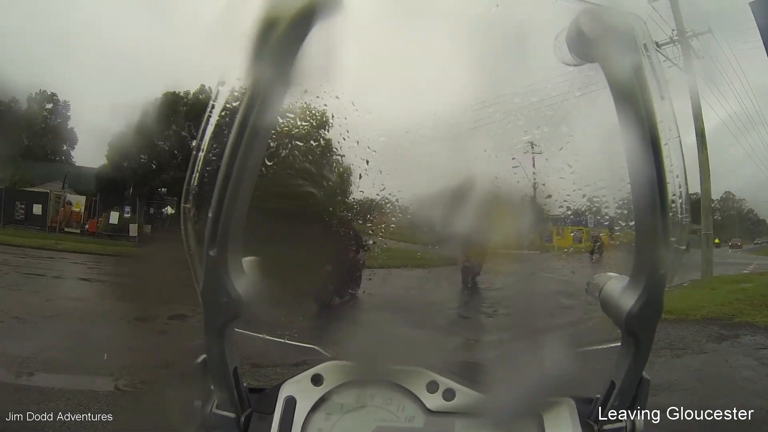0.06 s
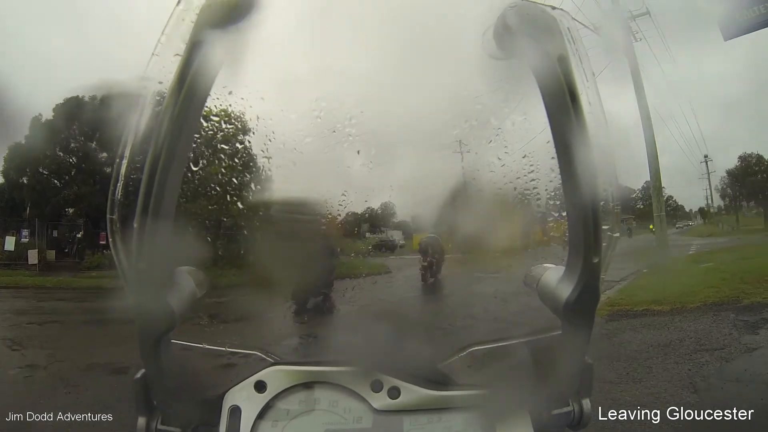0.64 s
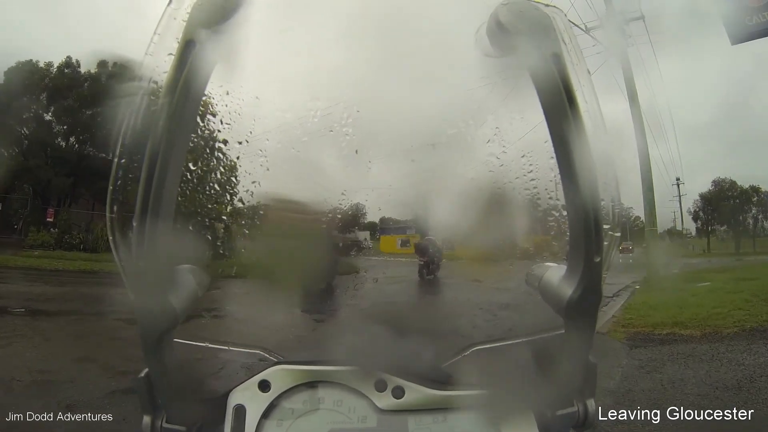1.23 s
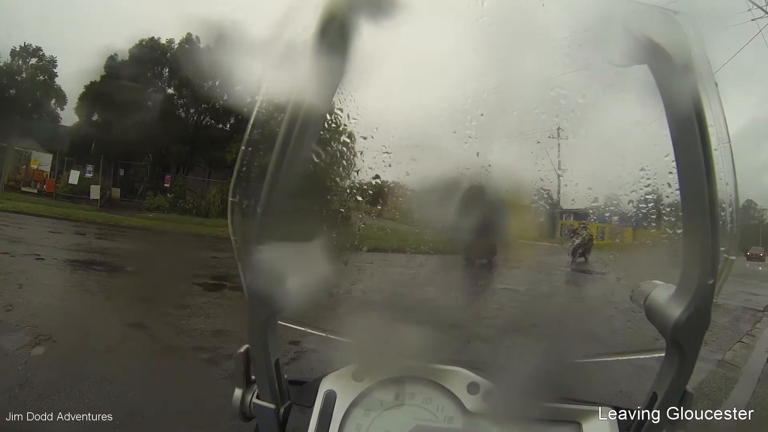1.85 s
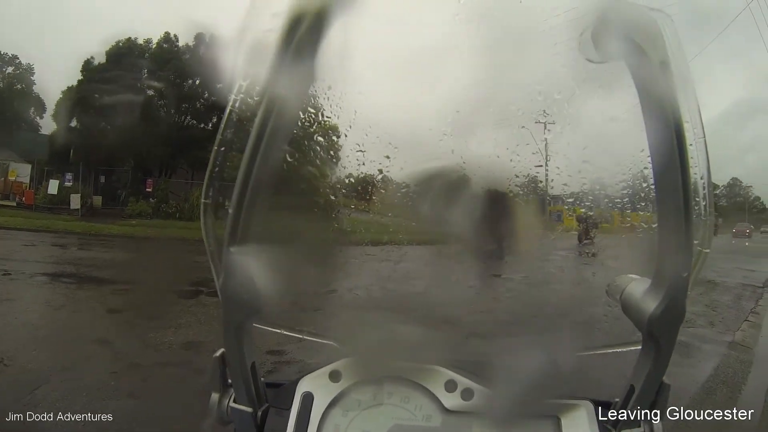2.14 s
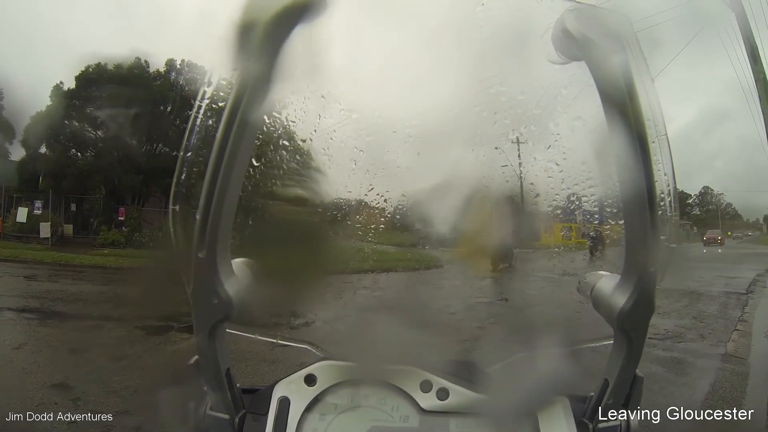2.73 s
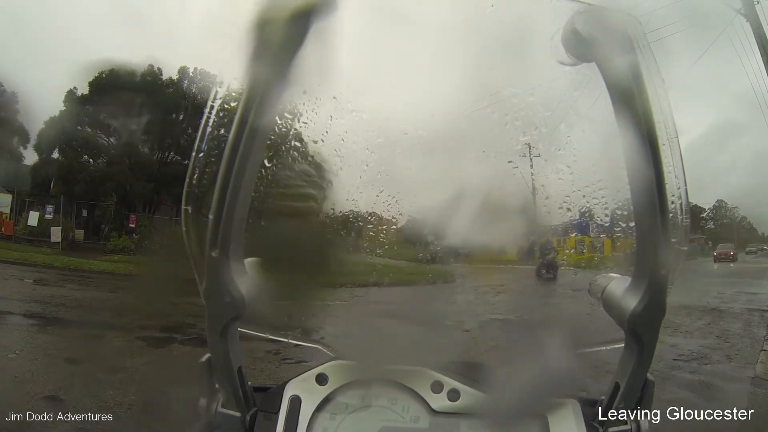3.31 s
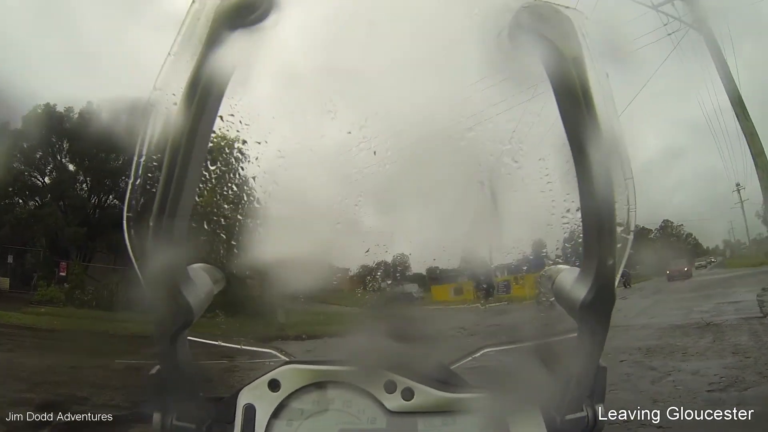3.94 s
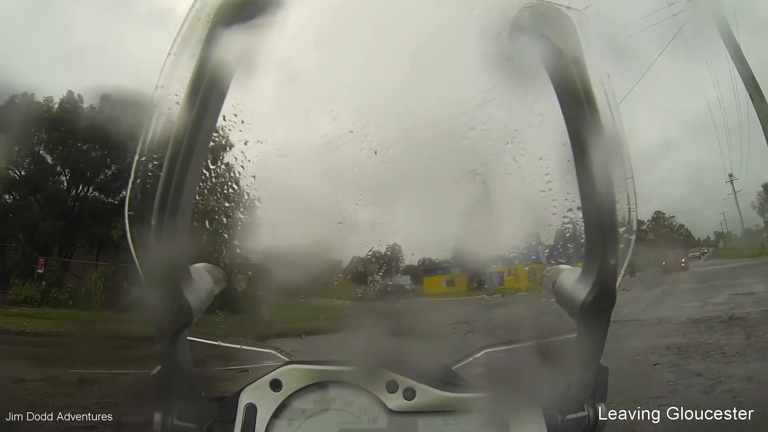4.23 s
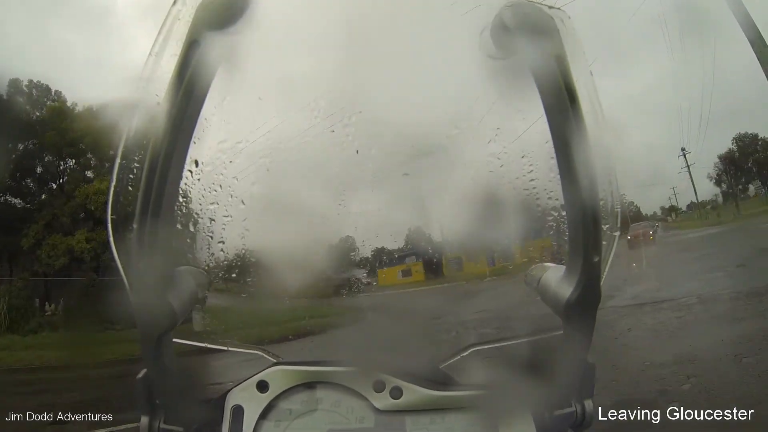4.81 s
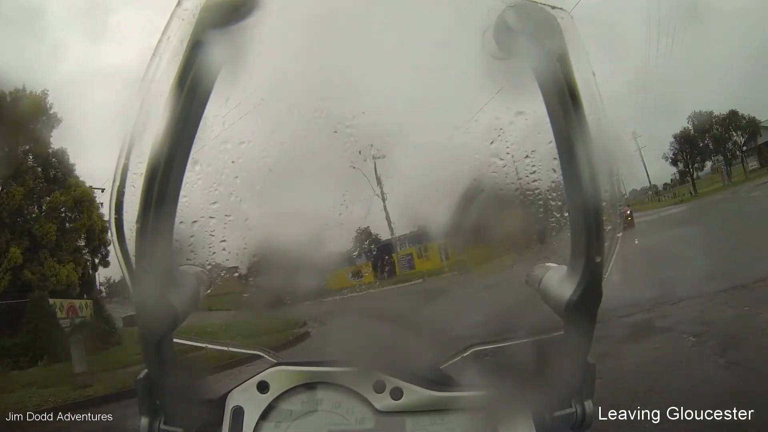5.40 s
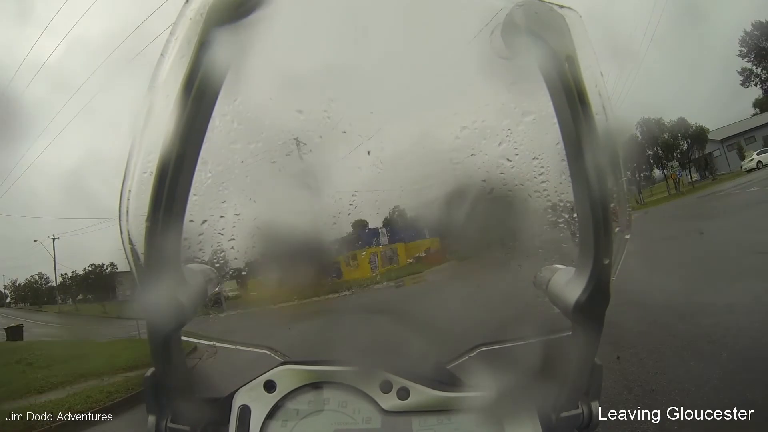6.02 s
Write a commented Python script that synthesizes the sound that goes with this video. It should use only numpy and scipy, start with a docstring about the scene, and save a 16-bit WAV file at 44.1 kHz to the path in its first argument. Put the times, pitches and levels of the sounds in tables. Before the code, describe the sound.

Heard from just behind the windscreen on a wet road, a motorcycle engine throbs unevenly at idle, with light ticks, clacks and booming panels. It stumbles briefly, then accelerates with a throaty growl before dropping to a lower, more ragged drone as the gears whine faintly. Wind rumbles and the road hisses softly throughout, and a few very faint raindrops tap once the bike is moving.

```python
"""Motorcycle on a wet road.

It idles, pulls away and rolls off the throttle, heard from behind its screen. Each engine cycle
throbs in the exhaust, booms in the panels and rattles the crankcase; under load the intake growls.
Valves tick, drivetrain slack knocks, gears whine, wind rumbles, raindrops tap and the road hisses."""
import sys
import numpy as np
from scipy import signal
from scipy.fft import rfft, irfft
from scipy.io import wavfile
from scipy.ndimage import uniform_filter1d

SR = 44100
rng = np.random.default_rng(int(sys.argv[2]) if len(sys.argv) > 2 else 0)


def inscribe(sig):
    """Save sig as 16-bit PCM at rate SR to the path in sys.argv[1].

    A 1-D sig is mono; a 2-D sig holds one channel per row.
    Samples are clipped to [-1, 1] before scaling.
    """
    pcm = np.round(np.clip(np.atleast_2d(sig).T, -1, 1) * 32767)
    wavfile.write(sys.argv[1], SR, pcm.astype(np.int16))


N = 271656
T = np.arange(N) / SR

# Engine speed. Each row: time in seconds, four-stroke cycle rate in Hz.
CYCLE_RATE = [(0.0, 11.755), (0.5, 13.632), (1.3, 12.74), (2.25, 13.535), (2.9, 13.564), (3.0, 16.3),
              (3.12, 29.8), (3.25, 31.8), (3.35, 33.7), (3.5, 36.782), (3.9, 38.411), (4.12, 37.871),
              (4.45, 36.314), (4.75, 33.449), (5.05, 31.331), (5.27, 28.444), (5.6, 21.82), (5.95, 24.271),
              (6.16, 24.501)]
# Idle stumbles. Each row: centre in seconds, cycle rate drop in Hz (negative: a surge).
STUMBLES = [(1.96, 1.5), (2.05, 3.5), (2.17, -4), (2.32, 1.75), (2.5, 1.44), (2.82, 2.61)]
# Throttle. Each row: time in seconds, opening from 0 to 1.
THROTTLE = [(3.199, 0), (3.42, 0.43), (3.63, 0.67), (3.643, 0.9), (3.899, 0.94), (4.622, 0.9),
            (4.741, 0.75), (5.098, 0.75), (5.652, 0.35), (6.16, 0.69)]
# Exhaust at idle. Each row: multiple of the cycle rate, relative level in dB.
IDLE_ORDERS = [(2, -32.5), (3, 0), (4, -5), (5, -18.5), (6, -17.5), (7, -24)]
# Exhaust at high and low riding revs. Each row: multiple of the firing rate, relative level in dB.
SMOOTH_ORDERS = [(0.25, -8), (0.5, -31), (0.75, -14), (1, 7), (1.25, -9), (1.5, -14), (1.75, -20),
                 (2, -11.5), (2.25, -31), (2.5, -24.5), (2.75, -43.5), (3, -42), (3.25, -24), (3.5, -31.5),
                 (3.75, -35), (4, -43), (4.25, -35.5)]
RAGGED_ORDERS = [(0.25, -0.5), (0.5, -11), (0.75, -19), (1, 5.5), (1.25, -11), (1.5, -1), (1.75, -9.5),
                 (2, -15), (2.25, -31), (2.5, -37), (2.75, -36.5), (3, -32)]
# Pipe and panel response to revs. Each row: cycle rate in Hz, gain in dB.
PIPE_TUNING = [(22, -15.5), (26, -16.5), (30.5, -12), (33, -10), (37, -9)]
PANEL_TUNING = [(13, -25), (22, -21), (29.5, -18), (34, -17), (38, -30)]
# Resonances. Each row: centre in Hz, width in Hz, relative gain in dB.
PANEL_MODES = [(178.36, 29.7, 4.5), (156, 50, -5.5), (260.9, 24, -10)]
CRANKCASE_MODES = [(342.4, 36, 15.5), (387, 17, 12.5), (522, 33, 10.5), (558, 26, 12), (754, 98, 5),
                   (965.6, 55, 11), (1050, 60, 10), (1336, 100, -4), (1791, 140, 0.5), (1943, 50, 5),
                   (2055, 99, 6.5), (2269, 130, 4.5), (2550, 180, -11), (2800, 98, -8)]
AIRBOX_MODES = [(363, 140, 13.5), (487.5, 70, 18), (586.5, 79, 16), (664, 46, 6.3), (922, 70, 5.3),
                (1040, 130, 8), (1289, 240, 7.2), (1530, 162, 9.8), (1662, 170, 2.3)]
RASP_MODES = [(2200, 240, 6.5), (2830, 350, -1), (3470, 290, 0.5), (4080, 180, -5.5), (5000, 470, -10.5),
              (9300, 8200, -25.5)]
FRAME_MODES = [(220, 100, 7.5), (257, 35, -0.5)]
# Engine labouring. Each row: start in seconds, hold in seconds, clatter and boom changes in dB.
LABOURING = [(.0, 0.22, 4, 3), (0.277, 0.021, 5, 5.5), (0.716, 0.047, -0.5, -12), (1.488, 0.1, 6, 6.5),
             (2.212, 0.014, 5, 1.5), (2.595, 0.16, 9, 6.5), (3.16, 0.13, 1.5, -0.5), (5.276, 0.22, 5, 1.5),
             (5.777, 0.064, 0.5, -8.5), (6.121, 0.055, 4, -1)]
# Once-a-cycle events. Each row: position as a share of the cycle, relative level in dB.
PISTON_SLAPS = [(.7, -2), (.79, 1), (.88, -2.5), (.25, -5.5)]
VALVE_CONTACTS = [(0.8, -9), (0.82, 0.5), (0.7, -6.5), (0.95, 3), (0.2, -11.5)]
INTAKE_GULPS = [(0.03, -2.5), (0.121, -2), (0.289, 3.5), (0.52, 0), (0.738, 3)]
# Noise spectra. Each row: frequency in Hz, relative gain in dB.
TICK_SPECTRUM = [(1200, -27.5), (2500, 5.5), (4500, 2.5), (7000, -5.5), (9500, -13.5), (13000, -20.5)]
WIND_SPECTRUM = [(15, -29), (28, 5.5), (39, 11.5), (55, -2.5), (100, -5), (300, -12.5), (1000, -84.5)]
ROAD_SPECTRUM = [(100, -1), (400, -5.5), (800, -14.5), (1200, -22), (2200, -21.5), (2500, -33),
                 (3200, -32.5), (3900, -42), (5000, -46), (8000, -51), (12000, -59.5), (15000, -84)]
KNOCK_SPECTRUM = [(200, -11.5), (550, -8.5), (820, 6.5), (1050, 4.5), (1400, -10), (2100, 0), (2500, -14.5),
                  (2900, -11), (3600, -27.5), (6000, -45.5), (9000, -66), (15000, -73)]
# Wind on the screen. Each row: time in seconds, level in dB.
BUFFETING = [(0, -29.5), (2.901, -23), (3.999, -25), (4.949, -23.5), (5.299, -18), (5.7, -22.5),
             (6.16, -16)]
# Panel thuds. Each row: start in seconds, pitch in Hz, strength in dB, decay in ms.
BUMPS = [(0.003, 190.3, -14, 71), (0.128, 192, -13, 42), (0.441, 180.4, -3, 35), (0.516, 181.8, -5.5, 44),
         (0.714, 182.4, -13, 103), (1.283, 179, -16, 38), (1.998, 159, 8, 7.5), (2.973, 188.2, -4, 18),
         (3.04, 177, -13.5, 11), (5.373, 189, 3, 11)]
# Hard ticks. Each row: start in seconds, level in dB.
SHARP_TICKS = [(0.135, -48), (0.311, -42), (0.384, -45.5), (0.685, -45.5), (0.758, -46), (1.37, -47),
               (1.607, -42), (1.684, -42.5), (2.089, -46), (2.226, -53), (2.304, -40.5), (2.856, -37.5),
               (2.97, -43.5), (4.838, -45), (5.13, -48.5), (5.184, -50), (5.382, -45), (5.461, -51),
               (5.492, -46.5), (5.524, -53), (5.59, -49), (5.646, -52), (5.768, -44), (5.881, -50),
               (5.897, -49.5), (5.946, -48), (6.051, -46)]
# Drivetrain knocks. Each row: start in seconds, strength in dB, decay in ms, hardness from 0 to 1.
KNOCKS = [(0.221, -35.5, 15, .1), (0.289, -24.5, 11, 0.6), (0.374, -30.5, 9.7, 0.5), (0.82, -33, 7.4, 0.5),
          (1.047, -26.5, 14, 0.2), (1.13, -30.5, 12, 0.7), (1.276, -30.5, 19, .3), (1.355, -24, 17, .3),
          (1.436, -28.5, 10, 0.1), (1.513, -24, 5.5, 0.4), (1.666, -25, 11, 0.4), (1.742, -27, 11, .2),
          (1.82, -28.5, 14, 0.3), (1.971, -31.5, 16, .1), (2.095, -18, 4.8, 0.8), (2.203, -27.5, 17, 0),
          (2.289, -28.5, 11, 0.6), (2.539, -12.5, 5.1, 0.94), (2.668, -26, 16, 0.4), (2.745, -27, 9, 0.4),
          (2.838, -20.5, 7.3, 0), (2.911, -24, 12, 0.3)]
# Casing and gear tones. Each row: start in seconds, hold in seconds, pitch in Hz, level in dB.
CASING_RINGS = [(1.48, 0.0062, 2255, -33.5), (1.562, 0.0087, 2290, -42), (2.681, 0.055, 2230, -40),
                (3.101, 0.15, 2260, -45), (5.31, 0.069, 2290, -38)]
GEAR_WHINES = [(5.244, 0.13, 963, -42), (5.36, 0.13, 1019, -47.5), (5.438, 0.41, 747, -43.5),
               (3.26, 0.06, 528, -39), (5.1, 0.078, 524, -38.5), (5.97, 0.15, 508, -39.5)]
# Spells of lugging. Each row: start in seconds, hold in seconds, level in dB.
LUGGING = [(3.18, 0.054, -24.5), (5.048, 0.12, -27), (5.471, 0.26, -36.5)]


def undb(db):
    """Decibels to gain."""
    return 10 ** (np.asarray(db) / 20)


def unit(x):
    """Scale to an rms of 1."""
    return x / np.sqrt(np.mean(x ** 2))


def noise():
    """White noise."""
    return rng.standard_normal(N)


def walk(rate_hz):
    """Smooth random drift, rms 1."""
    hold = int(SR / rate_hz)
    steps = np.repeat(rng.standard_normal(N // hold + 1), hold)
    return unit(uniform_filter1d(uniform_filter1d(steps, hold), hold)[:N])


def along(x, table):
    """Interpolate a two-column table at x."""
    return np.interp(x, *np.transpose(table))


def envelope(start_s, hold_s, attack_s, release_s):
    """Trapezoid that reaches 1 at start_s."""
    return np.clip(1 + np.minimum((T - start_s) / attack_s, (start_s + hold_s - T) / release_s), 0, 1)


def colour(x, spectrum):
    """Minimum-phase filter with the given spectrum."""
    size = 4096
    hz, db = np.transpose(spectrum)
    bins_hz = np.arange(size // 2 + 1) * SR / size
    gain = undb(np.interp(np.log(bins_hz + 1), np.log(hz), db))
    cepstrum = irfft(np.log(gain))
    cepstrum[1:size // 2] *= 2
    cepstrum[size // 2 + 1:] = 0
    return signal.fftconvolve(x, irfft(np.exp(rfft(cepstrum))))[:N]


def ring(x, modes):
    """Parallel band-pass resonances, output rms 1."""
    y = 0
    for hz, width_hz, db in modes:
        edges_hz = np.clip([hz - width_hz / 2, hz + width_hz / 2], 20, SR / 2 - 1)
        y = y + undb(db) * signal.sosfilt(signal.butter(2, edges_hz, "bandpass", fs=SR, output="sos"), x)
    return unit(y)


def muffle(x, top_hz):
    """Steep low-pass."""
    return signal.sosfilt(signal.butter(6, top_hz, fs=SR, output="sos"), x)


def swell(phase, at, depth_db):
    """Gain that peaks at the given share of each turn."""
    return unit(undb(depth_db * np.cos(2 * np.pi * (phase - at))))


def orders(phase, table, uneven_db=0):
    """Partials of a rotation; cylinder imbalance, uneven_db, offsets the fractional ones."""
    return unit(sum(undb(db + uneven_db * (k != round(k))) * np.cos(2 * np.pi * k * phase)
                    for k, db in table))


def firings(cycle, cylinder_db, scatter_db):
    """One pulse per firing, varying by cylinder and at random."""
    stroke = np.floor(cycle * len(cylinder_db)).astype(int)
    at = np.flatnonzero(np.diff(stroke) > 0) + 1
    level_db = np.take(cylinder_db, stroke[at], mode="wrap") + scatter_db * rng.standard_normal(len(at))
    pulses = np.zeros(N)
    pulses[at] = undb(level_db)
    return unit(pulses / np.sqrt(np.gradient(cycle)))


def cycle_pulses(cycle, table, scatter_db):
    """One pulse per cycle for each table row."""
    pulses = np.zeros(N)
    for share, db in table:
        at = np.flatnonzero(np.diff(np.floor(cycle - share)) > 0)
        pulses[at] += undb(db + scatter_db * rng.uniform(-1, 1, len(at)))
    return pulses


def bursts(pulses, decay_s):
    """Exponential decay after each pulse."""
    return unit(signal.lfilter([1], [1, -np.exp(-1 / (decay_s * SR))], pulses + 1e-9))


def tick(pulses, decay_s):
    """A bright noise burst per pulse."""
    return unit(colour(bursts(pulses, decay_s) * noise(), TICK_SPECTRUM))


def exhaust(cycle, rate_hz, riding):
    """Gas pulses: a lumpy throb at idle, then a drone, ragged at low revs and smooth at high."""
    ragged_hz, smooth_hz = 27.7, 36.7
    throb = -orders(cycle + .006 * walk(25), IDLE_ORDERS) * undb(-11.5 + .9 * walk(19))
    pulses = firings(cycle, cylinder_db=[2, -1.5, -2.5, -1.5], scatter_db=6)
    puffs = ring(pulses, [(83.3, 30.5, 0)]) * undb(-28)
    firing = 4 * cycle
    smooth = -orders(firing + .0019 * walk(110), SMOOTH_ORDERS, uneven_db=.5) * undb(.5 * walk(60))
    ragged = orders(firing + .5 + .055 * walk(70), RAGGED_ORDERS, uneven_db=-4) * undb(2.4 * walk(70))
    ragged *= swell(cycle, at=.77, depth_db=4)
    blend = np.clip((rate_hz - ragged_hz) / (smooth_hz - ragged_hz), 0, 1)
    turbulence = ring(noise() * swell(firing, at=.43, depth_db=6), [(262, 150, 1), (520, 170, -7)])
    drone = blend * smooth + (1 - blend) * ragged + turbulence * undb(-24.5)
    return (throb + puffs) * (1 - riding) + drone * undb(along(rate_hz, PIPE_TUNING)) * riding


def labouring():
    """Clatter and boom changes in dB while the engine labours."""
    return sum(np.outer(changes_db, envelope(start_s, hold_s, attack_s=.042, release_s=.11))
               for start_s, hold_s, *changes_db in LABOURING)


def bodywork(cycle, rate_hz, boom_db):
    """Firings boom in the hollow panels, one cylinder hardest."""
    blows = firings(cycle, cylinder_db=[-2, -8, -5, 4], scatter_db=2) + .27 * noise()
    return ring(blows, PANEL_MODES) * undb(along(rate_hz, PANEL_TUNING) + boom_db)


def crankcase(cycle, riding, clatter_db):
    """Gears and valves chatter in the casing; pistons slap at idle, the primary gear sings under way."""
    teeth_per_cycle = 84
    chatter = unit(noise() * undb(9.8 * np.tanh(walk(1500))))
    mesh = np.sin(2 * np.pi * (teeth_per_cycle * cycle + .089 * walk(160))) * undb(-19) * riding
    slaps = unit(cycle_pulses(cycle + .02 * walk(60), PISTON_SLAPS, scatter_db=3))
    lash = swell(cycle, at=.77, depth_db=3.5 - 1.4 * riding)
    blows = (chatter + mesh) * lash + slaps * undb(-2) * (1 - riding)
    casing = muffle(ring(blows, CRANKCASE_MODES), top_hz=3360)
    return casing * undb(-40.5 + clatter_db + 2 * riding)


def valves(cycle, riding):
    """Valves tick in a cluster each cycle, fainter under way."""
    taps = cycle_pulses(cycle + .012 * walk(60), VALVE_CONTACTS, scatter_db=3)
    return tick(taps, decay_s=.001) * undb(-59.5 - 10.5 * riding)


def wind():
    """Gusts buffet the screen."""
    gusts_db = 1.5 * walk(4.3)
    return unit(colour(noise(), WIND_SPECTRUM)) * undb(along(T, BUFFETING) + gusts_db)


def wet_road(riding):
    """Grainy spray hiss, slightly lower under way."""
    spray = noise() * undb(3 * np.tanh(walk(700)))
    return unit(colour(spray, ROAD_SPECTRUM)) * undb(-40 - riding + 2.1 * walk(9.1))


def bumps(rise_s):
    """Each bump sets the panels swinging briefly."""
    out = np.zeros(N)
    for start_s, hz, db, decay_ms in BUMPS:
        age_s = np.maximum(T - start_s, 0)
        swing = np.exp(-1000 * age_s / decay_ms) * (1 - np.exp(-age_s / rise_s))
        out += undb(db) * np.sin(2 * np.pi * hz * age_s) * swing
    return out


def sharp_ticks(decay_s):
    """Occasional hard ticks stand out from the valve noise."""
    level = sum(undb(db) * (T >= start_s) * np.exp(-np.abs(T - start_s) / decay_s)
                for start_s, db in SHARP_TICKS)
    return unit(colour(noise(), TICK_SPECTRUM)) * level


def knocks():
    """Drivetrain slack closes: soft blows ring the crankcase, hard ones clack."""
    hard = soft = 0
    for start_s, db, decay_ms, hardness in KNOCKS:
        decays = np.maximum(T - start_s, 0) * 1000 / decay_ms
        push = undb(db) * np.exp(-decays) * (1 - np.exp(-4 * decays))
        hard += push * np.sqrt(hardness)
        soft += push * np.sqrt(1 - hardness)
    blows = noise() * soft
    clacks = unit(colour(noise(), KNOCK_SPECTRUM)) * hard
    return clacks + ring(blows, CRANKCASE_MODES) * np.std(blows)


def casing_rings(width_hz):
    """A high casing resonance sings out briefly."""
    return sum(ring(noise(), [(hz, width_hz, 0)]) * undb(db)
               * envelope(start_s, hold_s, attack_s=.0073, release_s=.015)
               for start_s, hold_s, hz, db in CASING_RINGS)


def rain(riding, drops_per_s):
    """Drops tap the screen once the bike rides into them."""
    hits = rng.random(N) < drops_per_s / SR
    sizes = undb(3.5 * rng.uniform(-1, 1, N))
    return tick(hits * sizes, decay_s=.0007) * undb(-71) * riding


def intake(cycle, rate_hz, riding):
    """Uneven gulps of air bark in the airbox as the throttle opens; gas rasps on each one."""
    shut = 1 - along(T, THROTTLE)
    gulps = unit(cycle_pulses(cycle + .002 * walk(150), INTAKE_GULPS, scatter_db=1.8))
    # Valve flow repeats each cycle, with fresh turbulence on top.
    pattern = rng.standard_normal(1024)
    flow = pattern[(cycle % 1 * len(pattern)).astype(int)]
    air = (.85 * flow + .7 * noise()) * bursts(gulps, decay_s=.0018)
    airbox = muffle(ring(.8 * gulps + .7 * air, AIRBOX_MODES), top_hz=3080)
    growl = airbox * undb(-24 - 39.5 * shut)
    grit = unit(noise() * undb(5 * np.tanh(walk(700)))) * bursts(gulps, decay_s=.0022)
    sizzle = ring(grit, [(6830, 1700, 0)]) * undb(-15 - 6 * (rate_hz.max() - rate_hz))
    rasp = (ring(grit, RASP_MODES) + sizzle) * undb(-43 - 58.5 * shut)
    # Part throttle throbs once a cycle.
    lope = swell(cycle, at=.72, depth_db=np.clip(22 * shut - 1.5, 0, 4.5))
    return (growl + rasp) * lope * riding


def lugging(cycle, at):
    """Pulling at low revs, one heavy firing per cycle thumps the frame."""
    blows = firings(cycle - at, cylinder_db=[0], scatter_db=3.5)
    thumps = muffle(ring(blows, FRAME_MODES), top_hz=320)
    return thumps * sum(undb(db) * envelope(start_s, hold_s, attack_s=.048, release_s=.15)
                        for start_s, hold_s, db in LUGGING)


def gear_whines(waver, flutter_db):
    """Gear meshes sing unsteadily, mostly on the overrun."""
    out = np.zeros(N)
    for start_s, hold_s, hz, db in GEAR_WHINES:
        pitch_hz = hz * (1 + waver * walk(90))
        tone = unit(np.sin(2 * np.pi * np.cumsum(pitch_hz) / SR))
        gate = envelope(start_s, hold_s, attack_s=.072, release_s=.043)
        out += tone * undb(db - flutter_db * walk(40)) * gate
    return out


def scene():
    """Mono mix; the engine's cycle count keeps its parts in step."""
    stumble_s, pull_away_s, crossfade_s = .06, 2.995, .09
    drop_hz = sum(hz * np.exp(-((T - centre_s) / stumble_s) ** 2) for centre_s, hz in STUMBLES)
    rate_hz = along(T, CYCLE_RATE) - drop_hz
    cycle = np.cumsum(rate_hz) / SR
    riding = np.clip(.5 + (T - pull_away_s) / crossfade_s, 0, 1)
    clatter_db, boom_db = labouring()
    mix = exhaust(cycle, rate_hz, riding) + bodywork(cycle, rate_hz, boom_db)
    mix += lugging(cycle, at=.72) + bumps(rise_s=.006)
    mix += crankcase(cycle, riding, clatter_db) + gear_whines(waver=.019, flutter_db=5.5)
    mix += knocks() + casing_rings(width_hz=77)
    mix += valves(cycle, riding) + sharp_ticks(decay_s=.002) + rain(riding, drops_per_s=14)
    mix += intake(cycle, rate_hz, riding) + wind() + wet_road(riding)
    return mix[None]


def record(dry):
    """Soft clip, edge fades, low-pass."""
    ceiling, fade_s, top_hz = .84, .004, 13500
    rounded = dry / (1 + (dry / ceiling) ** 4) ** .25
    fade = np.clip(np.minimum(T, T[-1] - T) / fade_s, 0, 1)
    return signal.sosfilt(signal.ellip(8, .2, 70, top_hz, fs=SR, output="sos"), rounded * fade)


dry = scene()
out = record(dry)
inscribe(out)
```